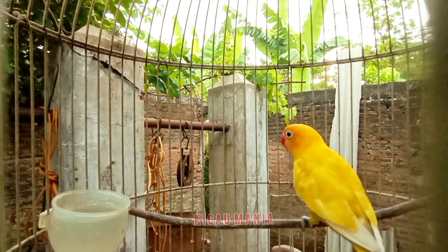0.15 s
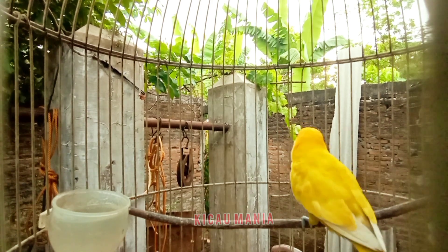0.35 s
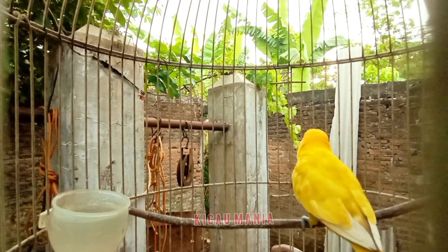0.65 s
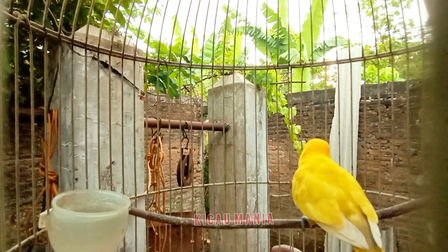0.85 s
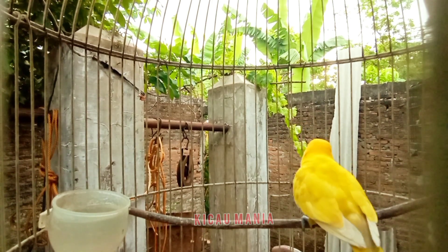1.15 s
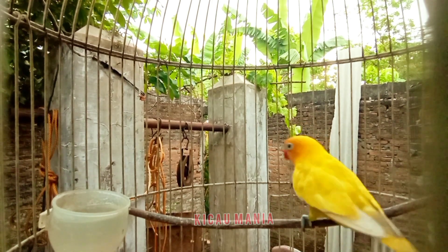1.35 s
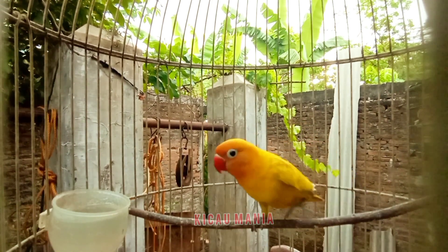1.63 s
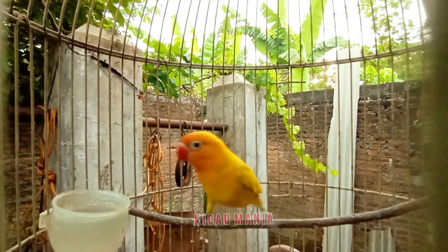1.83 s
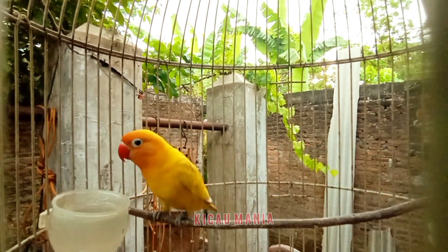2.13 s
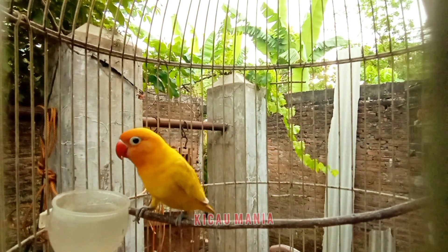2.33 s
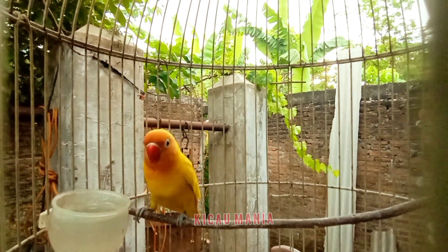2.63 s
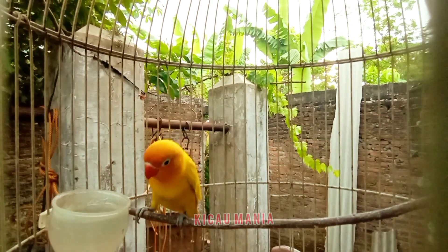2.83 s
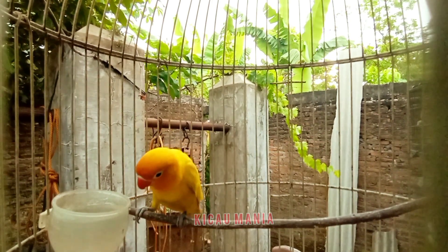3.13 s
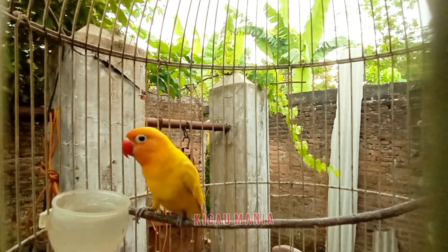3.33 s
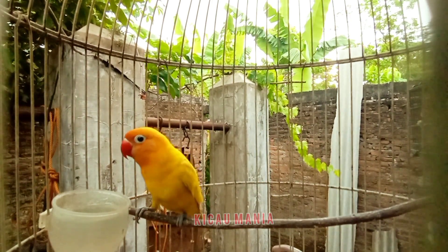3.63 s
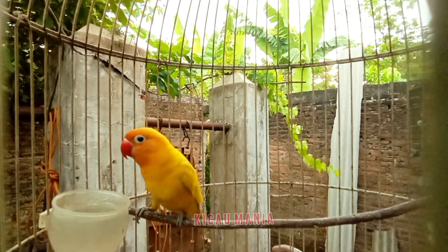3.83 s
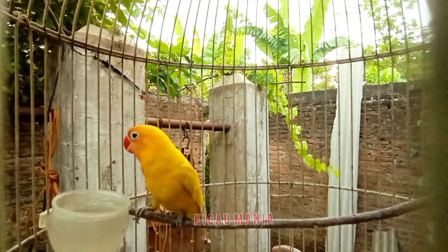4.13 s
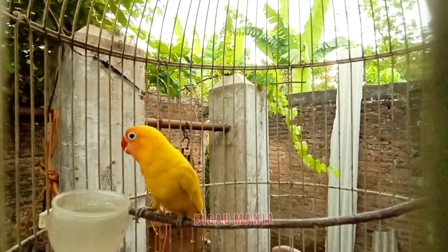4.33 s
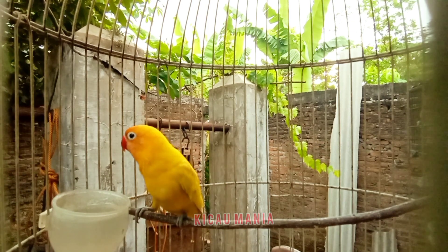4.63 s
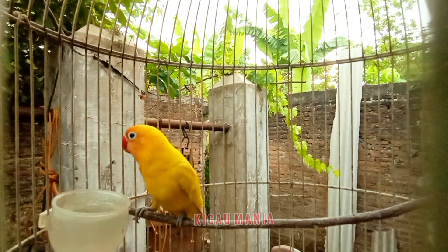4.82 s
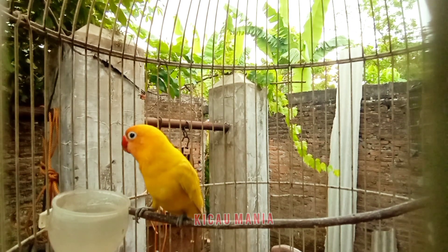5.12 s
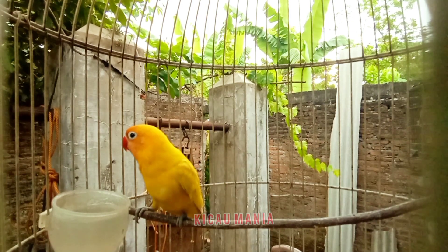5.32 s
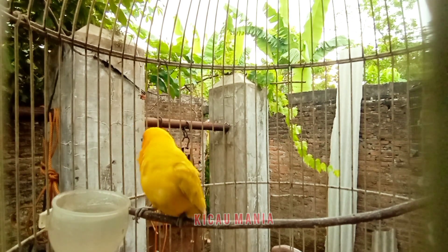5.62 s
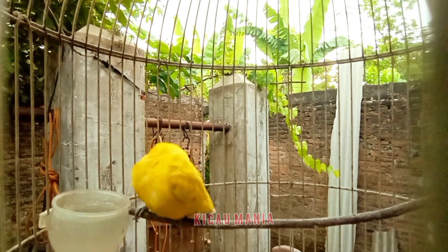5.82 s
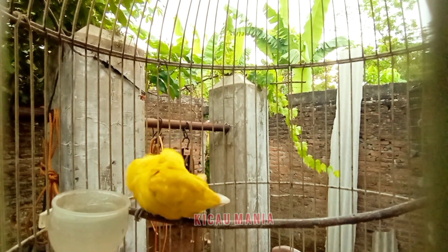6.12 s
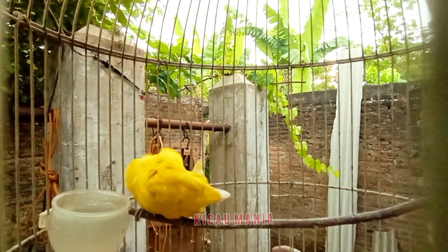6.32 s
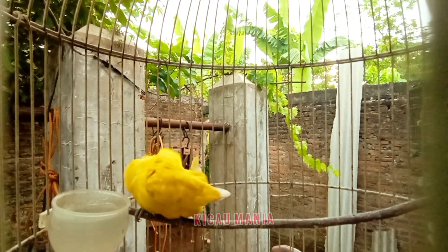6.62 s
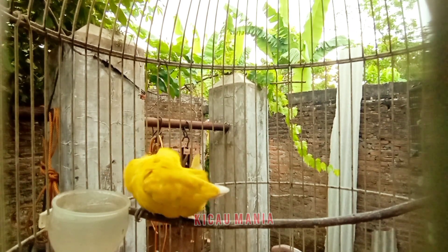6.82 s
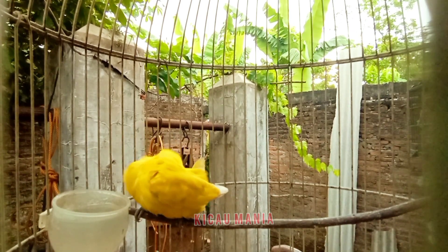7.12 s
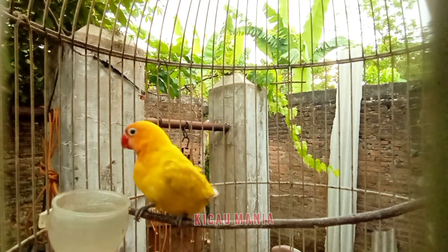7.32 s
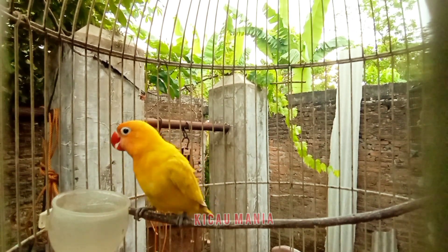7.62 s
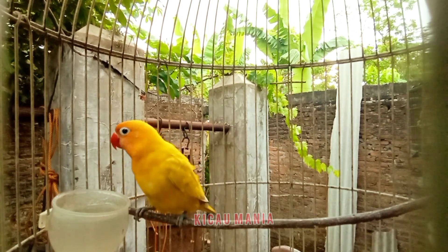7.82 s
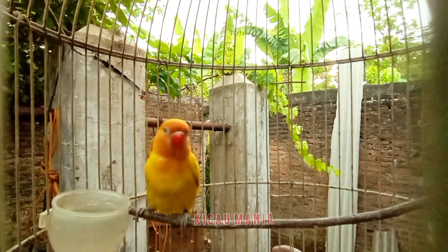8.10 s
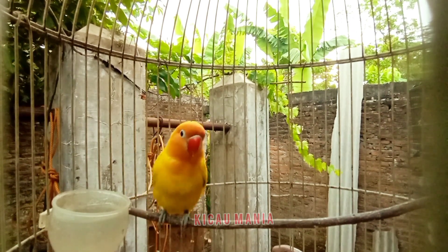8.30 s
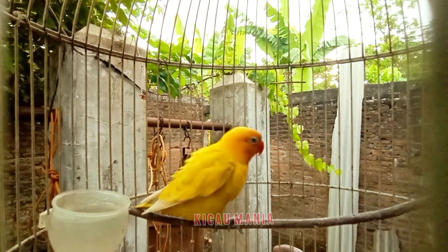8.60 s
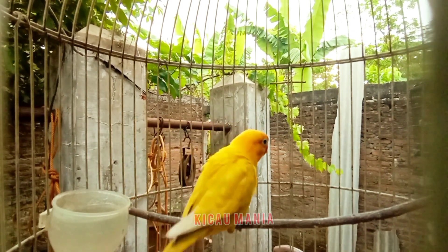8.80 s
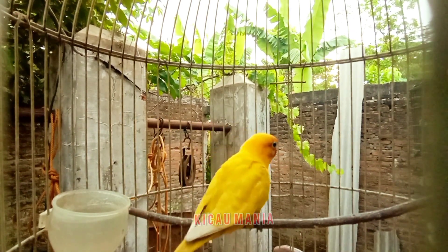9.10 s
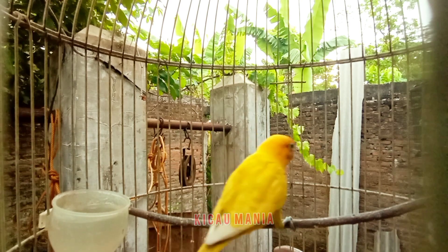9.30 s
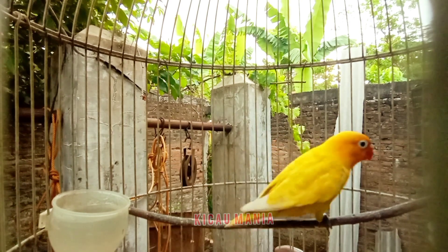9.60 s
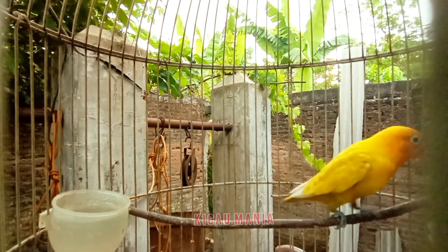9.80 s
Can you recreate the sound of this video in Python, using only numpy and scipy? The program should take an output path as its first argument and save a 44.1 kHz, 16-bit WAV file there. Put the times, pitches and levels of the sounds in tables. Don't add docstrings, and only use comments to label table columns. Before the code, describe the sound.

In a walled garden, a small parrot calls very close to the microphone, bright, raspy and clipping at its peaks, with short wall echoes. Two quick chips open the scene, then tight zigzag warbles at 0.65 and 1.15 seconds, and seven sharp hooked whistles from 1.4 to 2.6, about five a second, with beak clicks. A pause follows until a warble, slurred note and croak breaking into a squeal around 4.1 to 4.3. Feathers rustle briefly at 5.9. Slurs and another squawk come at 7.3 to 7.6, then seven evenly spaced warbles from 8.0 to 9.8. Throughout, a faint insect ticks about eleven times a second; a distant songbird whistles early and trills rapidly from 4.9 to 9.5. A small engine hums low and fades by 7; a heavier drone and road roar swell after 8.

```python
import sys
import numpy as np
from scipy import signal
from scipy.fft import rfft, irfft, next_fast_len
from scipy.io import wavfile
from scipy.ndimage import uniform_filter1d, map_coordinates

SR = 44100
rng = np.random.default_rng(int(sys.argv[2]) if len(sys.argv) > 2 else 0)


def nominal_scale(level):
    x = np.asarray(level, float) / 20
    return 10 ** x


def pcm_store(signal):
    levels = np.round(np.clip(np.atleast_2d(signal), -1, 1) * 32767)
    wavfile.write(sys.argv[1], SR, levels.astype(np.int16).T)


N = 438794


def unit(x):
    return x / np.sqrt(np.mean(x ** 2) + 1e-20)


def along(points, hz):
    f, v = np.transpose(points)
    return np.interp(np.log(hz + 1), np.log(f + 1), v)


def curves(rows):
    s, *cols = np.transpose(rows)
    return [np.interp(np.arange(N) / SR, s, c) for c in cols]


def wobble(rate, size=N):
    knots = rng.standard_normal(int(size * rate / SR) + 4)
    return map_coordinates(knots, [np.arange(size) * rate / SR])


def coloured(x, points):
    m = next_fast_len(len(x))
    gain = nominal_scale(along(points, np.fft.rfftfreq(m, 1 / SR)))
    return irfft(rfft(x, m) * gain, m)[:len(x)]


def noise(spectrum, patchy_db):
    z = signal.stft(rng.standard_normal(N), nperseg=512)[2]
    field = uniform_filter1d(rng.standard_normal(z.shape), 5, 0)
    field = unit(uniform_filter1d(field, 12, 1))
    patchy = signal.istft(z * nominal_scale(patchy_db * field), nperseg=512)[1][:N]
    return unit(coloured(patchy, spectrum))


def add(out, rows, rough, overtones_db, throat, breath_db=-90):
    s, hz, db = np.transpose(rows)
    t = np.arange(int(s[0] * SR), int(s[-1] * SR)) / SR
    pitch = uniform_filter1d(np.interp(t, s, hz), size=24)
    pitch = pitch * (1 + .08 * rough * wobble(450, size=len(t)))
    level = nominal_scale(np.interp(t, s, db) + 9 * rough * np.minimum(wobble(420, size=len(t)), 1))
    level = level * np.clip(np.minimum(t - s[0], s[-1] - t) / .0008, 0, 1)
    turn = 2 * np.pi * np.cumsum(pitch) / SR
    tone = 0
    for k, partial_db in enumerate(overtones_db, start=1):
        gain = nominal_scale(partial_db + along(throat, k * pitch))
        tone = tone + gain * np.sin(k * turn) * (k * pitch < SR / 2)
    throat_gain = nominal_scale(along(throat, np.fft.rfftfreq(len(t), 1 / SR)))
    air = irfft(rfft(rng.standard_normal(len(t))) * throat_gain, len(t))
    start = int(s[0] * SR)
    out[start:start + len(t)] += (level * (tone + nominal_scale(breath_db) * unit(air)))[:len(out) - start]


def played(shape, s, db, marks_ms, hz):
    stage, share, rel_db = np.transpose(shape)
    at = s + np.interp(stage, np.arange(len(marks_ms)), marks_ms) / 1e3
    return np.transpose([at, share * hz, db + rel_db])


# frequency in Hz, density in dB per Hz.
RUMBLE = [(50, -23), (90, -4), (160, -3), (240, -7.5), (700, -21), (1200, -120)]


def low_noise(patchy_db):
    return noise(RUMBLE, patchy_db)


# time in seconds, firing rate in Hz, level in dB.
IDLE = [(0, 34.4, -44), (1.1, 35.2, -46), (1.6, 35.5, -55), (2.7, 36.6, -56), (3.3, 37.1, -53.5),
        (4.3, 37.7, -53), (5.8, 39.1, -57), (7.2, 40, -64)]
# multiple of the firing rate, level in dB.
IDLE_ORDERS = [(1, -28), (2, -26.5), (3, -15), (4, 2.5), (5, -8.5), (6, -1), (7, -1.5), (8, -18), (9, -6.5),
               (10, -8.5), (11, -8.5), (12, -11), (13, -35.5)]


def small_engine():
    hz, db = curves(IDLE)
    turn = 2 * np.pi * np.cumsum(hz) / SR
    orders = sum(nominal_scale(level + 2.6 * wobble(0.9)) * np.sin(k * turn + k * k) for k, level in IDLE_ORDERS)
    exhaust_db = -8
    return nominal_scale(db + 3.5) * (unit(orders) + nominal_scale(exhaust_db) * low_noise(patchy_db=1.5))


# time in seconds, level in dB.
TRAFFIC = [(0.0, -60.5), (0.58, -67), (1.44, -63), (1.58, -63.5), (2.52, -69), (3.43, -65.5), (4.1, -53),
           (4.99, -57.5), (5.27, -54.5), (5.46, -50.5), (7.62, -56.5), (8.2, -47), (8.34, -43.5),
           (8.64, -51), (9.64, -43), (9.95, -47)]
# frequency in Hz, density in dB per Hz.
ROAR = [(300, -34.5), (500, -3.5), (1100, -1), (1250, 7), (1400, -0.5), (2050, -0.5), (3000, -10),
        (5000, -21), (7200, -25), (8000, -35.5), (16000, -39)]
# frequency in Hz, density in dB per Hz.
BOOM = [(20, -18.5), (45, -7), (70, 9.5), (95, -4.5), (200, -120)]


def road():
    abreast_db = -50
    near_db = curves(TRAFFIC)[0] - abreast_db
    swell = wobble(4.6)
    rumble = nominal_scale(-47 + 0.55 * near_db + 0.5 * swell) * low_noise(patchy_db=3.0)
    boom = nominal_scale(-57 + 1.7 * near_db + 1.7 * swell) * noise(BOOM, patchy_db=-3.5)
    gusts_db = .7 * swell + .8 * wobble(8)
    roar = nominal_scale(-45.5 + near_db + gusts_db) * noise(ROAR, patchy_db=4.0)
    return rumble + boom + roar


# frequency in Hz, density in dB per Hz.
AIR = [(2500, -30), (4000, -0.5), (7000, -1), (8000, -25), (16000, -29.5)]


def hush():
    return nominal_scale(-74) * unit(coloured(rng.standard_normal(N), AIR))


# tick number, time in seconds.
TICKS = [(0, .282), (7, .944), (9, 1.134), (27, 2.8), (40, 4.012), (54, 5.294), (63, 6.12), (75, 7.254),
         (81, 7.83), (86, 8.31), (103, 9.93)]


def insect():
    out = np.zeros(N)
    number, at = np.transpose(TICKS)
    for k in range(-2, 104):
        s = np.interp(k, number, at) - .005 + min(k, 0) * 0.13 + rng.normal(0, 0.00064)
        db = -50 + rng.normal(0, 2.1)
        rows = [(s, 6950, db - 8), (s + .004, 6500, db), (s + .013, 6250, db), (s + .026, 6050, db - 9)]
        add(out, rows, .3, [0], [(1000, 0.0093), (9000, 0.013)])
    return out


# frequency in Hz, gain in dB.
THROAT = [(1400, -24), (2300, -8), (3200, -7), (4200, -3), (5100, 0), (6200, -4), (7300, 0), (8300, -25),
          (9600, -18), (11500, -24), (13200, -38), (15000, -31), (16500, -45)]


def call(out, rows, rough, overtones_db, breath_db=-90):
    add(out, rows, rough, overtones_db, THROAT, breath_db)


# start in seconds, level in dB.
CHIPS = [
    (0.0285, -5),
    (0.0879, -8),
]
# share of its length, pitch in Hz, level in dB.
CHIP = [(0, 2296, -11), (.25, 2910, 2), (.7, 3523, 1), (1, 4330, -5.5)]


def chips(out):
    for s, db in CHIPS:
        call(out, played(CHIP, s, db, [0, 5.3], 0.93), .44, [0, 2, -4, -6, -9, -18], breath_db=-13)


# start in seconds, length in seconds, start Hz, end Hz, level in dB.
NOTES = [(.17, .046, 4200, 2900, -45.5), (.19, .05, 2550, 2800, -43), (.24, .06, 2780, 2600, -44),
         (.38, .081, 5500, 4880, -50), (.49, .024, 3000, 3800, -58), (.51, .035, 2400, 2780, -42.5),
         (.58, .074, 4150, 3000, -49), (.83, .053, 5500, 4900, -50), (.94, .035, 2400, 2800, -43),
         (1, .075, 4650, 3150, -49), (1.07, .065, 3200, 2450, -48), (1.27, .11, 2250, 2650, -49),
         (1.44, .043, 2050, 2060, -61), (3.38, .57, 4810, 4760, -63), (3.9, .051, 3650, 2880, -48),
         (4.45, .22, 4830, 4730, -63), (4.56, .17, 2250, 2980, -48.5), (4.79, .041, 3100, 2510, -44),
         (4.92, .07, 2600, 2780, -43), (5.675, .06, 4200, 5150, -46.5), (8.42, .094, 2050, 2070, -47.5),
         (9.6, .13, 2550, 2930, -47.5)]
# seconds after the start, pitch in Hz, level in dB.
FIGURES = [
    [(0, 2215, -62), (.025, 2385, -46), (.045, 2440, -46), (.07, 2447, -60), (.08, 2515, -64.5)],
    [(0, 2840, -55.5), (.012, 4030, -47.5), (.02, 4520, -53), (.03, 4543, -49), (.034, 3764, -43),
     (.048, 3770, -46), (.054, 3156, -47), (.066, 3040, -47), (.069, 2530, -50.5), (.08, 2630, -58)],
    [(0, 2700, -44.5), (.014, 3200, -47.5), (.03, 3550, -52), (.044, 3000, -48), (.06, 3735, -55.5),
     (.08, 3350, -54.5)],
    [(0, 2177, -45.5), (.008, 2663, -38.5), (.018, 3234, -41.5), (.027, 3493, -41), (.047, 3522, -48.5),
     (.052, 3550, -55.5), (.058, 3530, -48.5), (.075, 3518, -45), (.09, 3570, -64)],
]
TRILL = [.04, .5, .8, .1]
# figure, first start in seconds, period in seconds, repeats.
PHRASES = [(0, 1.565, .26, 2), (0, 2.057, .2357, 8), (1, 1.463, .2357, 7), (1, 3.108, .2395, 3),
           (2, 4.883, .109, 7), (3, 5.79, .115, 1), (3, 5.922, .114, 9), (3, 6.965, .1153, 22)]


def songbird():
    out, flat = np.zeros((2, N)), [(1000, 0), (9000, 0)]
    for s, length, start_hz, end_hz, db in NOTES:
        mid_hz = (start_hz + end_hz) / 2 + .25 * abs(end_hz - start_hz)
        share = np.array([0, .15, .5, .85, 1])
        hz = np.interp(share, [0, .5, 1], [start_hz, mid_hz, end_hz])
        rows = np.transpose([s + share * length, hz, db + np.array([-15.0, -3.5, 2, 0.5, -2.0])])
        long = length > .2
        trilled = start_hz > 2900 and length < .2
        add(out[int(trilled or long)], rows, 0.051 + 0.33 * trilled + 0.14 * long, [3], flat)
    for figure, first, period, repeats in PHRASES:
        trill = TRILL[figure]
        for s in first + period * np.arange(repeats):
            rows = np.add(FIGURES[figure], [s, 0, 3 + rng.normal(0, 0.52)])
            add(out[int(trill > .2)], rows, trill, [0, -34], flat)
    return out


# time in seconds, peak in dB.
BEAK = [(0.619, -39), (1.1223, -33), (1.3601, -20.5), (1.6052, -18), (1.9695, -19), (2.145, -21.5),
        (2.3376, -19), (2.544, -35.5), (7.9746, -22), (8.6177, -19), (9.4897, -14)]


def beak(out):
    for s, db in BEAK:
        call(out, [(s, 2100, db), (s + 0.0031, 2000, db - 28)], .4, [4, -9, -9])


# start in seconds, level in dB, first crest in ms, last crest in ms, crest in Hz.
WARBLES = [(0.6476, -7.5, 10.5, 23, 4750), (1.1492, -7.5, 9.2, 21, 4820), (4.07, -5.5, 11, 24, 5000),
           (7.9983, -6.5, 9.5, 22.5, 4930), (8.342, -7, 14, 28, 5000), (8.64, -5.5, 11, 23.5, 5093),
           (8.9551, -5.5, 9, 19, 5000), (9.25, -6, 8.5, 20.5, 5000), (9.513, -6, 9.5, 21, 5000),
           (9.7768, -7, 9.5, 21, 4830)]
# stage (start, snap, first crest, last crest, end), pitch share, level in dB.
ZIGZAG = [(0, 1.16, -10), (.35, 1.19, -1), (.7, 1.14, -8), (1, 1.05, 3), (1.35, .72, -6), (1.75, .99, 2),
          (2.08, 1, 3), (2.25, .8, -8), (2.38, .58, -2), (2.56, .95, 1), (2.7, .78, -2), (2.9, 1.01, -1),
          (3.15, 1.01, 0), (3.45, .76, -4), (3.7, .54, -5), (4, .34, -10)]
OPENING_DB = [0.5, -2, 1.5, 9.5, -0.5, 0, 6, 3.5, 2.5, 6]
# snap in ms, then pitch shares of first dip, middle crest, last dip, last crest.
TWISTS = [(4.6, .75, .9, .68, 1), (2.6, .72, 1, .92, 1.02), (5, .9, 1, .9, 1), (4.5, .8, 1, .82, 1.02),
          (9, .7, 1, .9, 1), (5.7, .65, .9, .64, 1.01), (4, .78, .85, .87, 1.01), (4, .8, .92, .9, 1.01),
          (4.5, .72, 1, 1, 1.12), (4.5, .85, 1, .93, .98)]


def warbles(out):
    plunge_ms = 9.2
    for (s, db, first, last, hz), opening_db, (snap, *turns) in zip(WARBLES, OPENING_DB, TWISTS):
        rows = played(ZIGZAG, s, db + 1.5, [0, snap, first, last, last + plunge_ms], hz)
        rows[[4, 9, 10, 12], 1] = np.multiply(turns, hz)
        rows[:3, 2] += opening_db
        call(out, rows, .33, [3, 1, -1, -6, -11, -30], breath_db=-19)


# start in seconds, level in dB, hook in ms, end in ms, held pitch in Hz.
WHISTLES = [
    (1.382, -5, 10, 36, 5020),
    (1.63, -3, 7, 30, 5080),
    (1.817, -4, 8.5, 33, 5080),
    (1.993, -2, 8, 32, 5060),
    (2.167, -4, 8, 33, 5050),
    (2.358, -4, 7.5, 31, 5080),
    (2.57, -3, 6, 28, 5130),
]
# stage (start, hook, catch in the voice, end), pitch share, level in dB.
HOOK = [(0, .66, -14), (.2, .63, -7), (.5, .6, -12), (.7, 1.03, -6), (1, 1.19, 0), (1.6, .96, -1),
        (2, .98, 0), (2.08, 1.015, -.5), (2.5, 1.005, -1.5), (2.88, 1, -5), (3, .99, -16)]
# rasp in Hz, hook in dB, catch in ms after the hook, catch in dB.
MANNER = [(3000, -0.5, 7, -20), (3760, 2.5, 6, -12), (3200, 3.5, 7.2, -10), (3250, -2.5, 4, -16.5),
          (3130, 0, 4.4, -16), (3070, -1.5, 2.3, -2.5), (4400, -7.5, 3.2, -12)]
OVERTONES = [1, -11, -8, -12, -15, -42.5]


def whistles(out, clear):
    break_s, break_step_s, break_hz, break_db = 2.3815, 2.6 / 1e3, 800, -14
    for (s, db, hook, end, hz), (rasp_hz, hook_db, catch, catch_db) in zip(WHISTLES, MANNER):
        rows = played(HOOK, s, db + 4.5, [0, hook, hook + catch, end], hz)
        rows[[4, 6], 2] += hook_db, catch_db
        if s < break_s < s + end / 1e3:
            crack = [(break_s + k * break_step_s, hz + break_hz * (k == 0), db + 3 + break_db * (k == 0))
                     for k in (-1, 0, 1)]
            rows = np.vstack([rows[:8], crack, rows[9:]])
        rows[:3, 1] *= rasp_hz / rows[1, 1]
        call(clear, rows, .06, OVERTONES, breath_db=-41.5)
        rasp = [(s, 7200, db - 20.5), (s + 0.0048, 7200, db - 13.5), (s + hook / 860.0, 7100, db - 20.0)]
        call(out, rasp, .6, [0], breath_db=-8.0)


def wisps(out):
    hz, lead_db = 5750, -14
    for s, db, *_ in WARBLES + WHISTLES:
        rows = [(s - 0.0015, hz, db + lead_db - 9.0), (s + 0.00061, hz, db + lead_db)]
        call(out, rows, .6, [0], breath_db=-3.0)


# time in seconds, pitch in Hz, level in dB.
LOW_HUM = [(3.1, 69.5, -64.5), (3.6, 71.6, -55), (4, 71.6, -76), (4.8, 50, -61), (5.3, 47.5, -57.5),
           (6.8, 50.1, -47.5), (7.85, 50.55, -46.5), (8.1, 48.44, -59), (8.65, 50.3, -52.5), (9, 52.4, -47.5),
           (9.95, 55.3, -44.5)]
# time in seconds, pitch in Hz, level in dB.
DRONE = [(4.2, 113, -64), (5.59, 106.1, -48.5), (5.8, 101, -57), (6.94, 99.3, -51.5), (7.42, 91, -51.5),
         (8.44, 89.7, -47), (8.56, 102, -45), (9.95, 112, -49.5)]


def engine_hum():
    out = np.zeros(N)
    for rows, unsteady in ((LOW_HUM, .01), (DRONE, .02)):
        fade_in = (rows[0][0] - .4, rows[0][1], -85)
        hz, db = curves([fade_in] + rows)
        level = nominal_scale(db + 4.5 + 4.0 * wobble(16.0))
        out += level * np.sin(2 * np.pi * np.cumsum(hz * (1 + unsteady * wobble(4.4))) / SR)
    return out


# time in seconds, pitch in Hz, level in dB.
SLURS = [
    [(4.152, 3900, -11), (4.156, 5100, -4), (4.16, 6400, -12), (4.1625, 4180, -5), (4.168, 4750, -11),
     (4.176, 4950, -8), (4.186, 5150, -7), (4.19, 5100, -20)],
    [(7.311, 6300, -32), (7.315, 5400, -11), (7.319, 4500, -16), (7.321, 5200, -9), (7.324, 4750, -6),
     (7.331, 4650, -6), (7.338, 4500, -9), (7.346, 4600, -18)],
    [(7.404, 3900, -16), (7.407, 4400, -15), (7.409, 6300, -10), (7.413, 6400, -8), (7.416, 5300, -6),
     (7.421, 5150, -5), (7.431, 5050, -9), (7.439, 5000, -14)],
    [(7.325, 5000, -20), (7.333, 5200, -10), (7.338, 5600, -11), (7.347, 5600, -18)],
]
SLUR_ROUGH = [.6, .4, .2, .4]


def slurs(out):
    for rows, rough in zip(SLURS, SLUR_ROUGH):
        call(out, rows, rough, [2.5, 5, -4, -8], breath_db=-20)


# share of the croak, pitch in Hz, level in dB.
CROAK = [(0, 1552, -11.5), (.2, 2135, -3.5), (.33, 2437, 0), (.8, 2384, 1), (.94, 2110, 1), (1, 2740, 1.5)]


def croak(s, db, break_ms, wobbles):
    rows = played(CROAK, s, db, [0, break_ms], 0.99)
    ms = np.arange(0, break_ms + .1, .5)
    at = s + ms / 1e3
    bobs = np.clip((ms - .335 * break_ms) / 6.3, 0, wobbles)
    hz = np.interp(at, rows[:, 0], rows[:, 1])
    level_db = np.interp(at, rows[:, 0], rows[:, 2])
    return np.transpose([at, hz + 750 * np.sin(np.pi * bobs) ** 2, level_db])


# start in seconds, level in dB, break in ms, end in ms, wobbles.
SQUAWKS = [
    (4.234, -6, 51, 85, 4),
    (7.485, -6, 53, 96, 2),
]
# share of the squeal, pitch in Hz, level in dB.
SQUEAL = [(0, 4900, -2), (.14, 6400, -7), (.39, 5500, -12), (.43, 5200, 3), (.56, 5300, -1),
          (.75, 6000, -3), (1, 5800, -14)]
SQUEAL_DB = [-4, 1]


def squawks(out):
    for (s, db, break_ms, end, wobbles), squeal_db in zip(SQUAWKS, SQUEAL_DB):
        low = croak(s, db, break_ms, wobbles)
        high = played(SQUEAL, s + break_ms / 1e3, db + squeal_db, [0, end - break_ms + 1], 1)
        for rows in (low, high):
            call(out, np.add(rows, [0, 0, .5]), .33, [2, 0, -4, -6, -6, -12], breath_db=-19)


# frequency in Hz, density in dB per Hz.
SHEEN = [(6300, -25), (7200, 9), (8200, -12), (10000, 0), (11600, -3), (13200, -13), (15000, 3),
         (16500, -29)]


def parrot():
    out, clear = np.zeros((2, N))
    chips(out)
    beak(out)
    warbles(out)
    whistles(out, clear)
    wisps(out)
    slurs(out)
    squawks(out)
    floor_s, floor_db = .00059, -9
    out = out + nominal_scale(floor_db) * np.roll(out, round(floor_s * SR))
    effort = uniform_filter1d(np.abs(out + .4 * clear), size=90)
    hiss = nominal_scale(-25) * effort * unit(coloured(rng.standard_normal(N), SHEEN))
    return out + hiss, clear


# frequency in Hz, density in dB per Hz.
FEATHERS = [(3500, -47.5), (5000, 7), (7500, 5), (10000, -1), (13000, -0.5), (15000, 3.5), (16000, -4.5)]


def feathers():
    since = np.arange(N) / SR - 5.868
    rise_s, hold_s, fade_db_s = .012, 0.03, 602
    envelope_db = np.minimum(45 * since / rise_s, fade_db_s * (hold_s - since))
    db = -43 + np.minimum(envelope_db, 0)
    return nominal_scale(db + 2.2 * wobble(300)) * noise(FEATHERS, patchy_db=3.0)


# frequency in Hz, reverberation time in seconds.
YARD = [(500, 0.81), (2000, 0.45), (5000, 0.42), (9000, 0.39), (15000, 0.3)]


def yard(x, lengthen):
    out, step = np.zeros(N + 2 * SR), SR // 5
    for at in range(0, N, step):
        part = x[at:at + step]
        if np.abs(part).max() <= 1e-7:
            continue
        hz, t, z = signal.stft(rng.standard_normal(SR // 2), SR, nperseg=256)
        t60 = lengthen * along(YARD, hz)[:, None]
        tail = signal.istft(z * nominal_scale(-60 * t / t60), SR, nperseg=256)[1]
        wet = signal.fftconvolve(part, tail / np.linalg.norm(tail))
        out[at:at + len(wet)] += wet
    return out[:N]


# delay in seconds, level in dB.
WALLS = [(.0027, -14), (.0046, -16), (.0095, -19), (.017, -19), (.048, -25)]
# frequency in Hz, gain in dB.
REFLECT = [(1500, -18.5), (2800, -4.5), (4900, -4), (6100, 0), (8400, -5.5), (10000, 0), (13200, -8),
           (15000, 0)]


def wall_answer(rough, steady):
    earlier = np.zeros(N)
    call(earlier, [(0, 5400, -1), (.003, 5400, -9.5)], .6, OVERTONES, breath_db=-5)
    stir = wobble(900)
    bird = rough + steady
    echoes = sum(nominal_scale(db) * np.pad(bird, (round(s * SR), 0))[:N] for s, db in WALLS)
    blurred = (rough + earlier) * (0.46 + 1.6 * stir) + steady * (1.05 + .95 * stir)
    return coloured(echoes + nominal_scale(-15.5) * yard(blurred, lengthen=0.88), REFLECT)


def scene():
    rough, steady = parrot()
    bird = rough + steady + wall_answer(rough, steady)
    clear, trilled = songbird()
    hidden = insect() + trilled
    far = nominal_scale(-3.5) * clear + nominal_scale(-19.5) * hidden
    far = far + yard(nominal_scale(-2.5) * clear + hidden, lengthen=0.46)
    street = small_engine() + engine_hum() + road()
    return np.tile(bird + far + street + feathers() + hush(), (2, 1))


def low_pass(x):
    return signal.sosfilt(signal.butter(12, 16170, fs=SR, output="sos"), x)


def record(dry):
    loud = uniform_filter1d(np.abs(dry[0]), size=2500)
    x = dry / (1 + 1.4 * loud)
    x = x / (1 + np.abs(x / 1.05) ** 20) ** (1 / 20)
    grit = x[0] * wobble(900) * np.clip(loud / .15, 0, 1)
    grit = coloured(grit, [(3500, -60), (4500, -22), (9000, -15), (12000, -29)])
    return low_pass(np.clip(x + [grit, -grit], -1, 1))


dry = scene()
out = record(dry)
pcm_store(out)
```